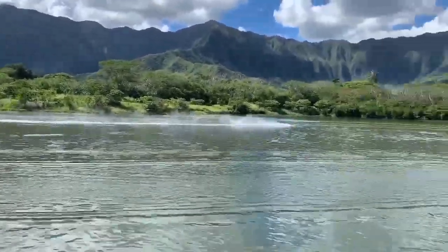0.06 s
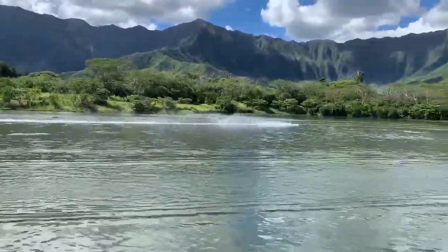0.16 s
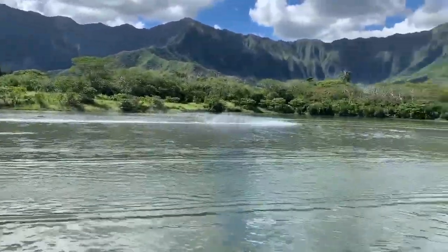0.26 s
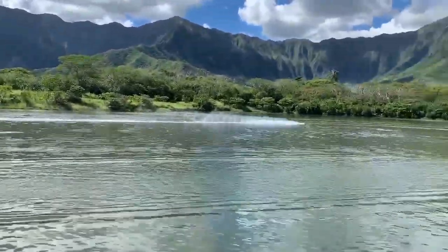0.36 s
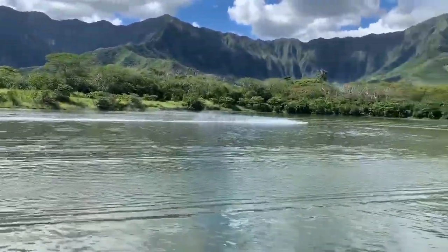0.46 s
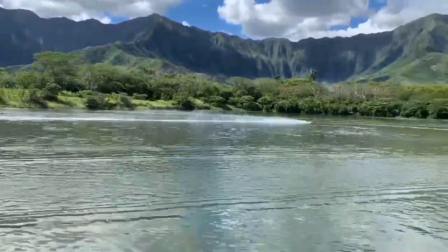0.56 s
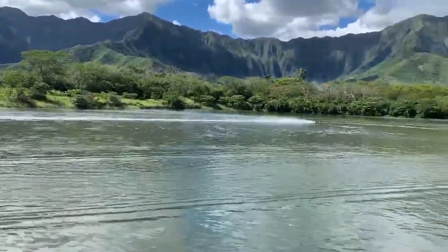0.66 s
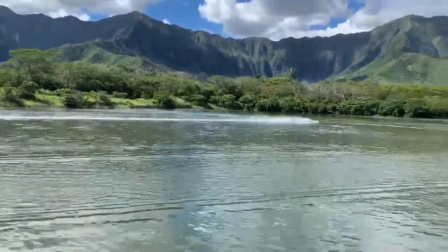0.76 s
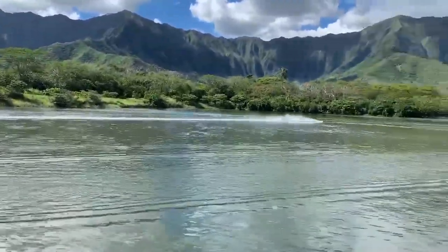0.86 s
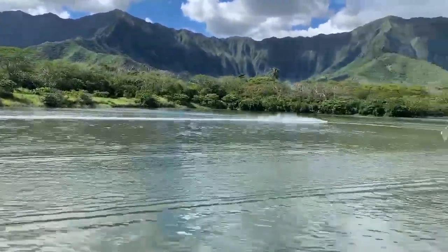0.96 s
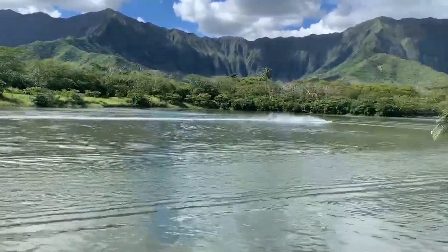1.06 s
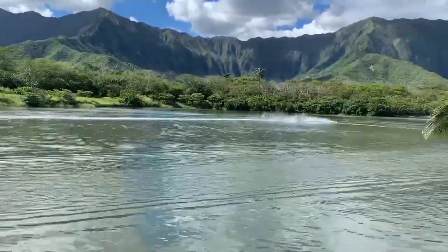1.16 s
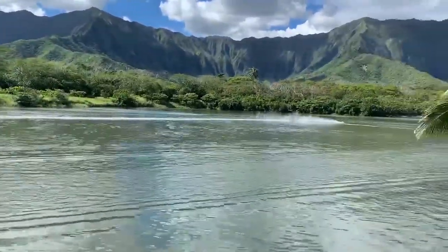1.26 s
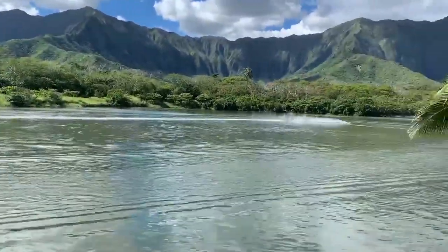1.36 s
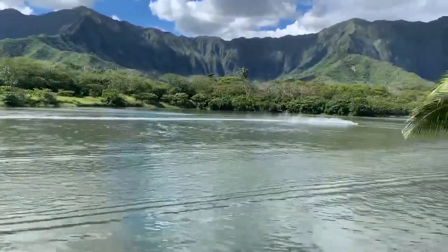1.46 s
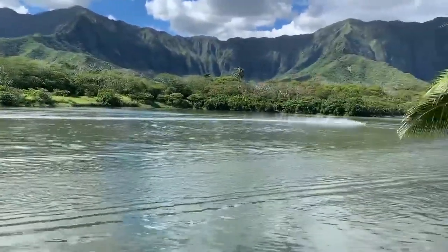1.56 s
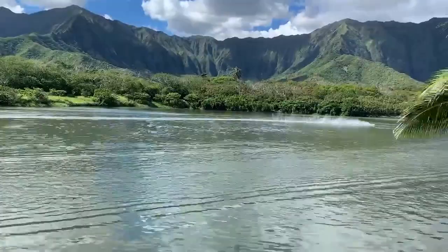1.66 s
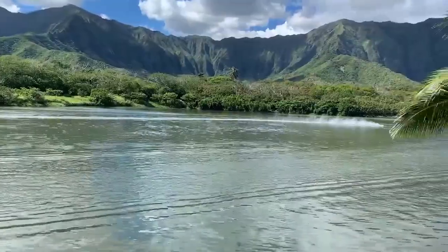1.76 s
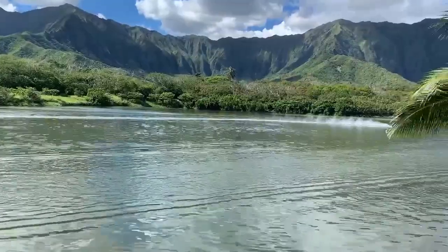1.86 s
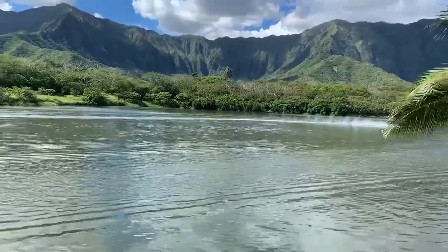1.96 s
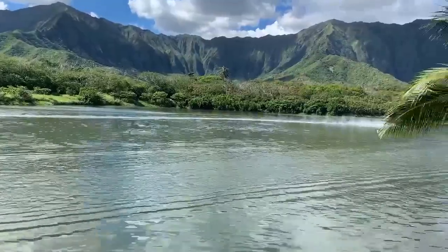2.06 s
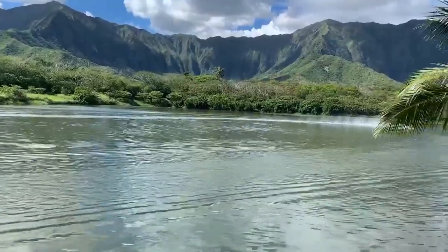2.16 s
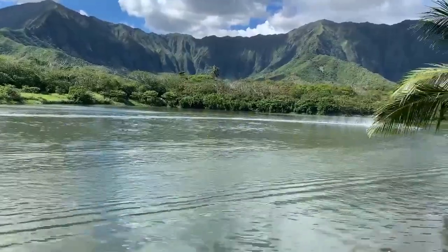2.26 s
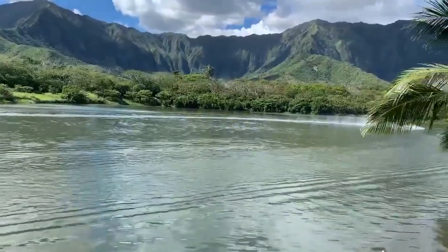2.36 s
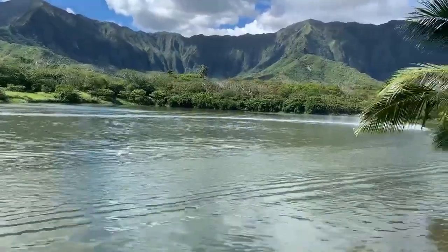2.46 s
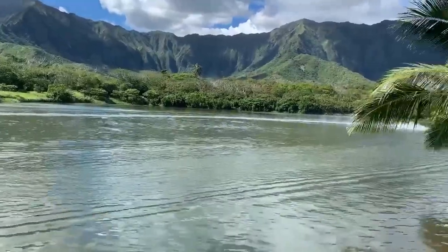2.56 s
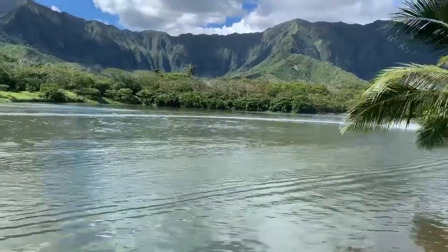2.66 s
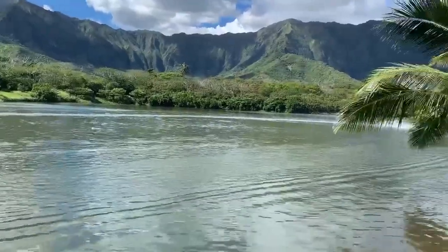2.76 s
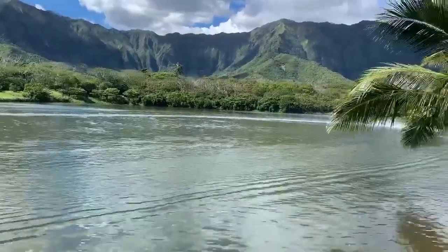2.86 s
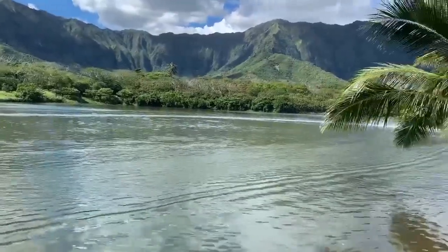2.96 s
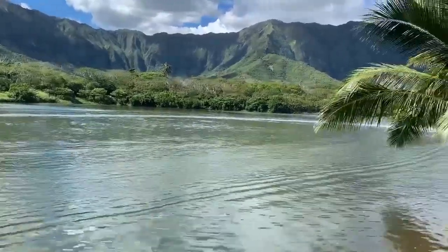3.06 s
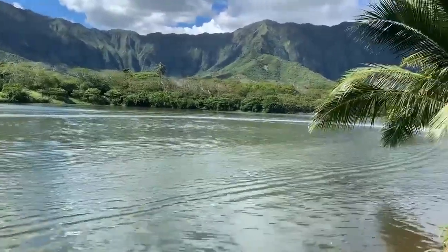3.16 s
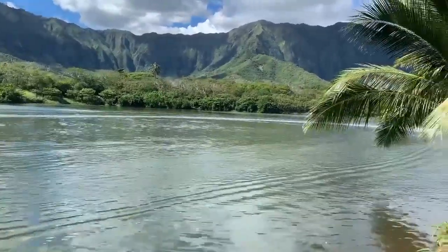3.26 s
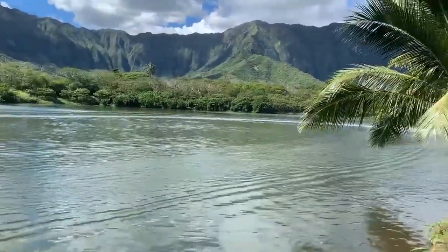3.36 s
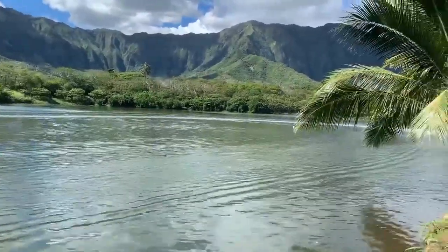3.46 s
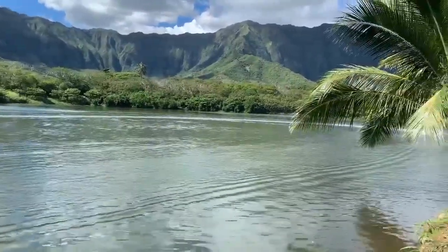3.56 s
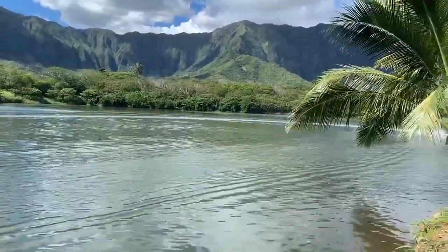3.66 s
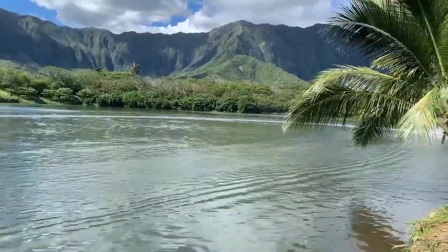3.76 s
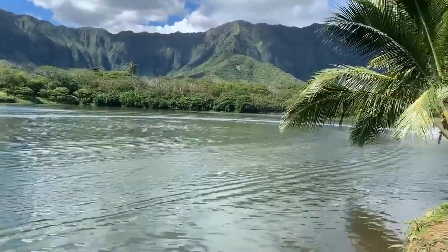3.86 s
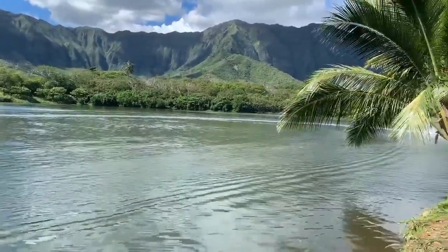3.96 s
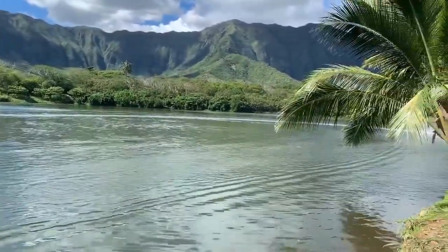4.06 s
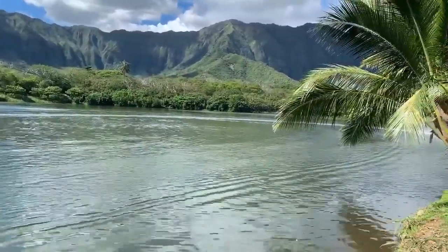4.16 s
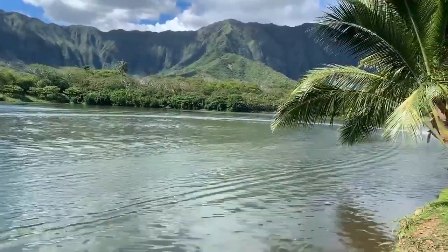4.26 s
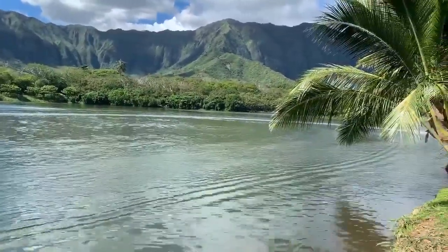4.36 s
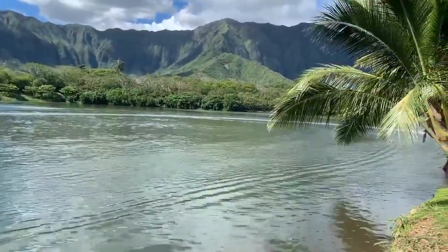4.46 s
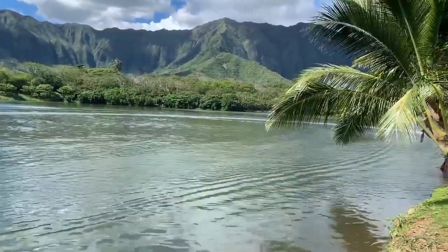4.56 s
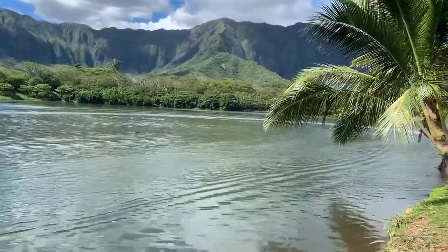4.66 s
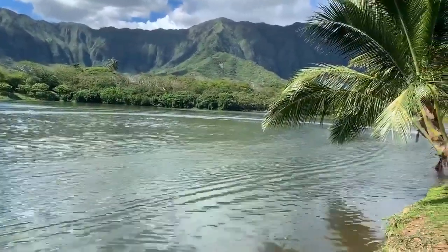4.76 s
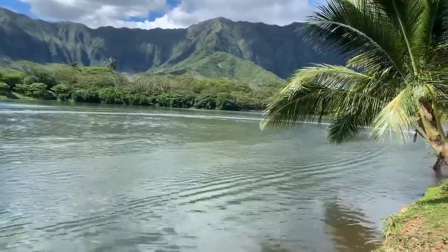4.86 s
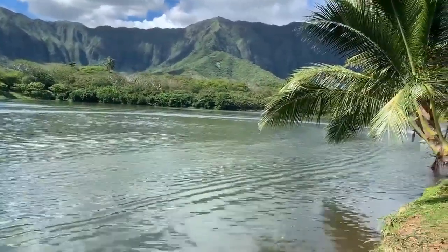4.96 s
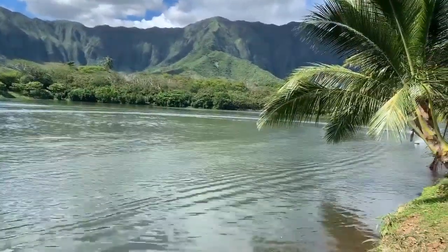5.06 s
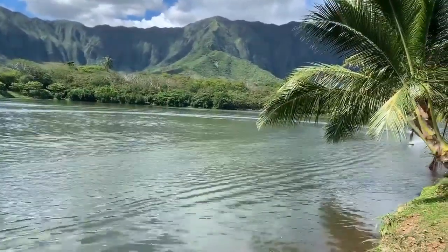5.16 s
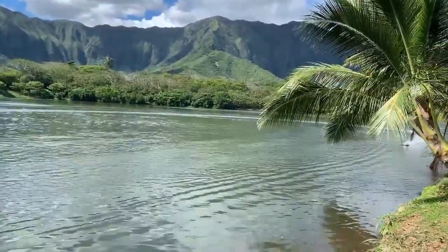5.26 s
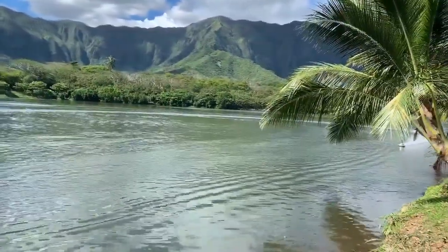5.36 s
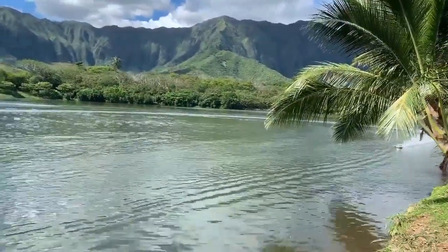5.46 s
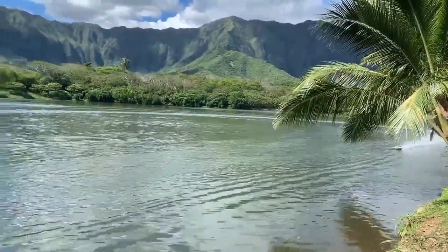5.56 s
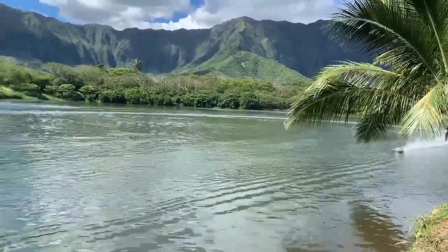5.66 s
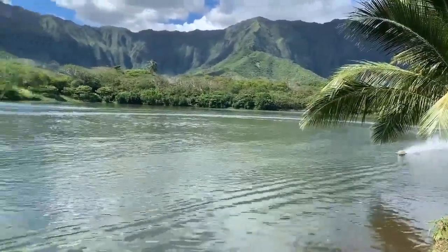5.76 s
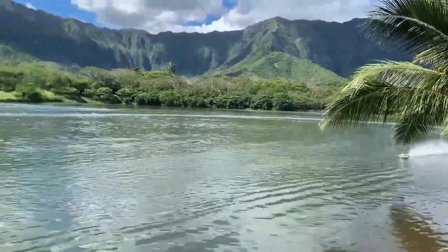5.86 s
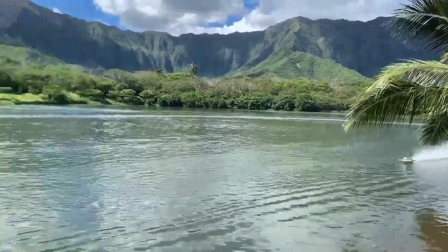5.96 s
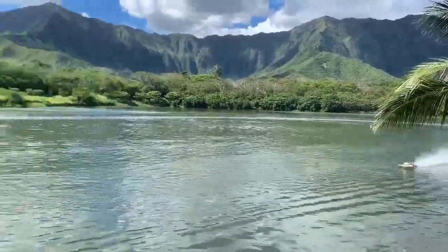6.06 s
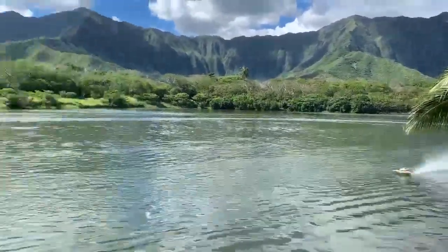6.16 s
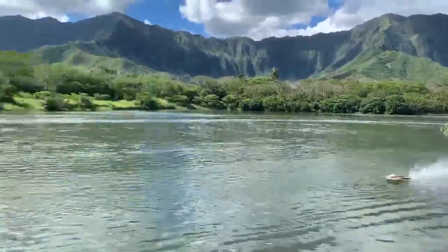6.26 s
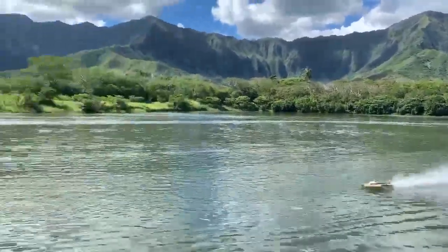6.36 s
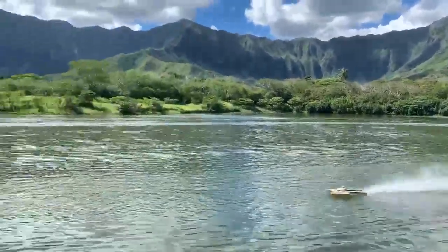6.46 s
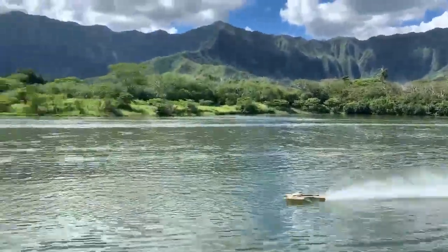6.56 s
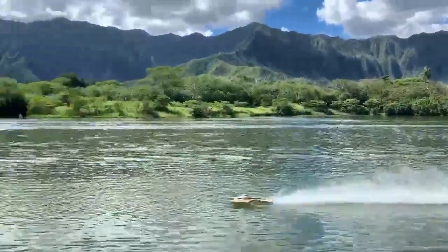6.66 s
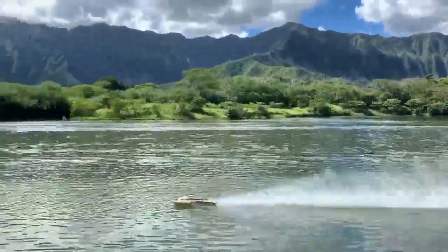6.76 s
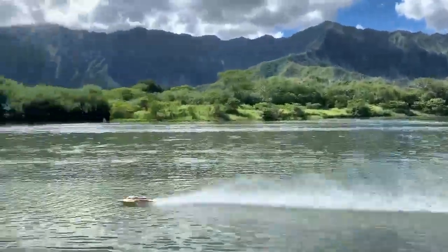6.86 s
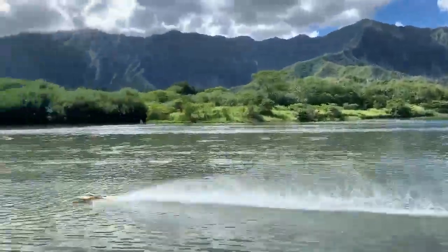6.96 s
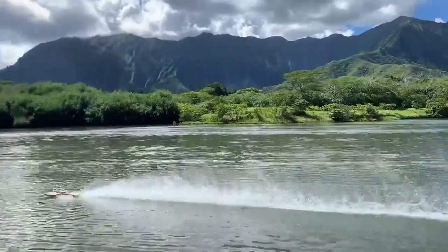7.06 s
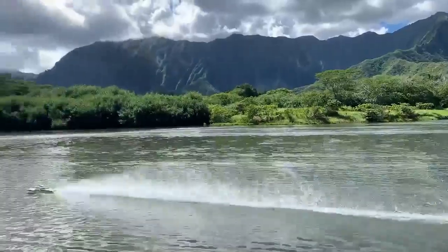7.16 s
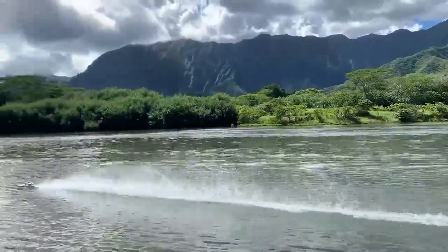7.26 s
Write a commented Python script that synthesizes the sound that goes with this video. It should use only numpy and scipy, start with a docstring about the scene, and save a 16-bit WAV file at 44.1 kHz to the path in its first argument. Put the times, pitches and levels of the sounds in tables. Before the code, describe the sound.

A model racing boat with a tiny two-stroke engine buzzes away over a river, its whine fluttering as the hull hops. In the far turn the throttle shuts twice, the pitch dropping to a mutter with pops and climbing back. The engine sags briefly, then returns louder and rasping, passing close in rushing spray with one hull slap. Open riverbank, stereo microphone on shore, faint echo from the banks, light breeze rumble.

```python
"""A model hydroplane with a small two-stroke engine races round a river course, heard from the bank.
It runs away, hopping so the revs race; in the far turn the throttle shuts twice and the pipe mutters and pops.
Then it sags under load, comes back and passes close by in a swell of spray, with one slap of the hull.
Each firing is a tone, a bark of pipe overtones and a jet of cracks and hiss that rasps and sizzles.
The banks echo the engine, filtered noise rushes behind the hull and a light breeze rumbles throughout."""
import sys
import numpy as np
from scipy import signal
from scipy.fft import rfft, irfft, next_fast_len
from scipy.io import wavfile
from scipy.ndimage import uniform_filter1d, map_coordinates

SR = 44100
rng = np.random.default_rng(int(sys.argv[2]) if len(sys.argv) > 2 else 0)


def transcribe(u):
    """Save the signal u as a 16-bit wav file named by the first command-line argument.

    u: samples, shape (n,) or (channels, n), limited to [-1, 1]; the rate is SR.
    q: integer samples, one column per channel.
    """
    v = np.clip(np.atleast_2d(u).T, -1, 1)
    q = np.round(v * 32767).astype(np.int16)
    wavfile.write(sys.argv[1], SR, q)


N = 321930


def from_db(db):
    """Decibels to gain."""
    return 10 ** (np.asarray(db) / 20)


def rms_one(x):
    """Scale to unit power."""
    return x / np.sqrt(np.mean(x ** 2) + 1e-20)


def evened(x, size=2200):
    """Unit power from moment to moment."""
    power = np.mean(np.atleast_2d(x) ** 2, axis=0)
    smooth_power = uniform_filter1d(uniform_filter1d(power, size), size)
    return x / np.sqrt(smooth_power + 1e-12)


def in_time(rows):
    """Each column of a curve at every sample; the first column is the time in seconds."""
    s, *columns = np.transpose(rows)
    return [np.interp(np.arange(N) / SR, s, column) for column in columns]


def bump(when, lasts):
    """Bell-shaped swell that falls to 1/e at lasts seconds from its top."""
    return np.exp(-((np.arange(N) / SR - when) / lasts) ** 2)


def at_hz(points, hz):
    """Read a spectrum on a log-frequency axis."""
    f, value = np.transpose(points)
    return np.interp(np.log(hz + 1e-3), np.log(f), value)


def coloured(x, spectrum):
    """Filter a sound by a spectrum that rolls off beyond both ends; rms 1."""
    size = next_fast_len(N)
    hz = np.arange(size // 2 + 1) * SR / size
    low_end = np.minimum(hz / spectrum[0][0], 1) ** 2
    high_end = np.minimum(spectrum[-1][0] / (hz + 1), 1) ** 2
    gain = low_end * high_end * from_db(at_hz(spectrum, hz))
    return rms_one(irfft(rfft(x, size) * gain, size)[..., :N])


def drift(rate):
    """Chance wandering with spread 1: noise through two equal low-pass poles at rate Hz."""
    step = 40  # samples between the computed values
    r = np.exp(-2 * np.pi * rate * step / SR)
    noise = rng.standard_normal(N // step + 2002)
    slow = signal.lfilter([1], [1, -2 * r, r * r], noise)[2000:]  # the filter has settled by then
    return np.interp(np.arange(N) / step, np.arange(len(slow)), rms_one(slow))


# How alike diffuse sound is at the two microphones. Each row: frequency in Hz, coherence from 0 to 1.
LIKENESS = [(60, 1), (300, 0.54), (800, 0.37), (1600, 0.042), (3500, 0.22), (10000, 0.12)]


def diffuse(size):
    """White stereo noise, alike in the bass and mostly unrelated above."""
    mid, side = rfft(rng.standard_normal((2, next_fast_len(size, True))))
    alike = np.clip(at_hz(LIKENESS, np.linspace(0, SR / 2, len(mid))), -1, 1)
    return irfft(np.sqrt(1 + alike) * mid + np.sqrt(1 - alike) * side * [[1], [-1]])[:, :size]


def placed(x, lag_ms):
    """The sound reaches one microphone before the other; a positive lag delays the left."""
    shift = lag_ms * SR / 2000  # half the lag to each side, in samples
    return np.array([map_coordinates(x, [np.arange(N) + sign * shift], order=3, mode="nearest")
                     for sign in (-1, 1)])


# Breeze level. Each row: time in seconds, level in dB.
BREEZE_LEVEL = [(0, -46.5), (1.5, -44), (3.3, -43.5), (3.9, -38), (4.7, -44), (5.3, -38), (5.9, -48.5),
                (7.3, -49)]
# Breeze colour, a low rumble. Each row: frequency in Hz, relative density in dB per Hz.
BREEZE_COLOUR = [(15, -22), (30, -9), (55, 4), (130, -2.5), (250, -13), (2000, -19.5), (10000, -84)]


def breeze():
    """Light wind: diffuse low-heavy noise whose level wanders."""
    level_db = in_time(BREEZE_LEVEL)[0] + drift(2.7)
    return from_db(level_db) * coloured(diffuse(N), BREEZE_COLOUR)


# One slap of the hull: time of its top in seconds, level in dB, time to fall to 1/e in seconds.
SLAP = (6.867, -21.5, .016)
# Slap colour. Each row: frequency in Hz, relative density in dB per Hz.
SLAP_COLOUR = [(250, 1), (450, -8), (850, 14), (1400, -16)]


def slap():
    """A short thump of water under the hull."""
    when, level_db, lasts = SLAP
    return from_db(level_db) * bump(when, lasts) * coloured(diffuse(N), SLAP_COLOUR)


FAR_BARK_DB = -30.5  # bark level of the distant boat, the reference for rush and echo
# the rush grows only a little with the bark: level at FAR_BARK_DB, dB per dB of bark above it
RUSH_DB, RUSH_FOLLOWS = -40, 0.029
# the plume of spray sweeps past the bank: top in s, time to fall to 1/e in s, added dB at the top
PASS_S, PASS_LENGTH_S, PASS_RUSH_DB = 6.44, 0.77, 12
CUT_RUSH_DB = -7.5  # the spray sinks too as the boat slows, at the bottom of a throttle cut
# Rush of spray and rough exhaust. Each row: frequency in Hz, relative density in dB per Hz.
RUSH_COLOUR = [(60, -19), (150, -6), (400, 1.5), (580, -2), (850, 5), (1400, 4), (1950, -15.5), (2600, 3),
               (3100, -23), (3600, -37)]


def spray(turns, bark_db, slump):
    """Noise of spray and rough exhaust that throbs with the firings and swells as the plume goes by."""
    passing_db = PASS_RUSH_DB * bump(PASS_S, PASS_LENGTH_S)
    level_db = RUSH_DB + RUSH_FOLLOWS * (bark_db - FAR_BARK_DB) + passing_db + CUT_RUSH_DB * slump
    throb = (1 + .75 * np.cos(2 * np.pi * turns)) * from_db(.9 * drift(15))
    return from_db(level_db) * coloured(diffuse(N) * throb, RUSH_COLOUR)


BANK_T60_S, BANK_DELAY_S = 1, .058  # time for the tail to fall by 60 dB, delay of the single echo
# echo against direct sound in dB: at FAR_BARK_DB, the floor close by, and dB lost per dB of bark
FAR_ECHO_DB, NEAR_ECHO_DB, ECHO_FOLLOWS = -4.5, -11.5, 0.49


def echo_level(bark_db):
    """The fainter the boat, the more of it comes by way of the banks."""
    return np.maximum(NEAR_ECHO_DB, FAR_ECHO_DB - ECHO_FOLLOWS * (bark_db - FAR_BARK_DB))


def with_banks(x, echo_db, scatter_db=-3):
    """The nearest bank returns one echo and its trees scatter a tail, so every change of pitch is heard twice."""
    t = np.arange(int(BANK_T60_S * SR)) / SR
    paths = diffuse(SR * 2)[:, :len(t)] * from_db(-60 * t / BANK_T60_S) * (t > .02)
    paths = paths * from_db(scatter_db) / np.sqrt(np.sum(paths[0] ** 2))
    paths[:, int(BANK_DELAY_S * SR)] += 1
    paths = paths / np.sqrt(np.sum(paths[0] ** 2))
    echo = signal.fftconvolve(x.mean(axis=0)[None], paths, axes=1)[:, :N]
    # direct and echo share the power, so the overall level holds
    return (x + from_db(echo_db) * echo) / np.sqrt(1 + from_db(echo_db) ** 2)


# Engine speed with the propeller in the water, as heard; it sags under the load of the turn.
# Each row: time in seconds, firings per second.
CRUISE = [(0, 240.7), (0.7, 250.3), (1.3, 255.3), (2.1, 257.5), (2.9, 255.1), (3.8, 249.4), (4.3, 237.4),
          (4.58, 199.6), (4.74, 210.8), (4.85, 235.6), (5.15, 227.1), (5.6, 233.2), (6.0, 230.9),
          (6.65, 236.4), (6.95, 229.0), (7.3, 230.0)]


def cruising():
    """Revs at open throttle before the hops and landings are added."""
    return in_time(CRUISE)[0]


# The hull hops off a ripple and the unloaded engine races.
# Each row: time of the top in seconds, rise in firings per second, whole length in seconds.
HOPS = [(0.08, 6, 0.17), (0.378, 6, 0.09), (0.71, 6, 0.05), (0.84, 24, 0.16), (0.975, 13, 0.11),
        (1.15, 21, 0.12), (1.245, 9, 0.05), (1.437, 6, 0.12), (1.568, 7, 0.08), (1.689, 11, 0.11),
        (1.77, 11, 0.06), (1.844, 22, 0.06), (1.932, 19, 0.08), (2.014, 13, 0.05), (2.16, 12, 0.05),
        (2.205, 11, 0.04), (2.265, 15, 0.05), (2.356, 28, 0.07), (2.415, 16, 0.06), (2.493, 19, 0.05),
        (2.577, 17, 0.1), (2.674, 19, 0.06), (2.73, 10, 0.04), (2.802, 29, 0.08), (2.905, 24, 0.08),
        (2.966, 13, 0.04), (3.478, 20, 0.07), (3.555, 9, 0.05), (3.682, 17, 0.13), (3.76, 31, 0.08),
        (4.29, 19, 0.12), (4.92, 17, 0.17), (5.243, 6, 0.14), (5.433, 12, 0.14), (5.67, 13, 0.09),
        (5.752, 12, 0.15), (6.09, 4, 0.12), (6.355, 9, 0.13), (6.474, 8, 0.19), (6.765, 4, 0.06),
        (6.9, 5, 0.06)]
# The hull lands hard and the propeller bites.
# Each row: time of the bottom in seconds, change in firings per second, whole length in seconds.
LANDINGS = [(0.325, -4, 0.07), (1.04, -5, 0.08), (1.615, -8, 0.06), (1.885, -13, 0.04), (2.295, -7, 0.06),
            (2.46, -7, 0.04), (2.845, -7, 0.06), (3.615, -7, 0.06), (5.36, -3, 0.06), (6.0, -2, 0.08),
            (6.84, -4, 0.09)]


def hops():
    """Extra firings per second: a smooth swell each time the propeller lifts, a dip when it bites."""
    t = np.arange(N) / SR
    racing = np.zeros(N)
    for top, rise, length in HOPS + LANDINGS:
        racing += rise * np.cos(np.pi * np.clip((t - top) / length, -.5, .5)) ** 2
    return racing


# The driver lifts off for the far turn. Each row: shut in seconds, reopened in seconds,
# back at speed in seconds, firings per second that the revs sink towards,
# share of the revs won in a last surge as the pipe comes into tune.
THROTTLE_CUTS = [(2.97, 3.17, 3.46, 102, .22), (3.841, 4.02, 4.225, 66, 0)]
# time constant of the falling revs, curve of their return, length of the last surge
COAST_S, PICKUP_POWER, SURGE_S = .07, 1.25, .045
FADE_S, SWELL_POWER = 0.028, 1.48  # the bark fades sooner than the revs, and swells back with them


def throttled(open_speed):
    """Revs die away exponentially and pick up ever faster; slump in power: 0 wide open, 1 at the bottom."""
    t, speed, slump = np.arange(N) / SR, open_speed, 0
    for shut, reopened, back, lowest, surge in THROTTLE_CUTS:
        coasted = np.clip(t, shut, reopened) - shut
        pickup = np.clip((t - reopened) / (back - reopened), 0, 1)
        last_surge = np.clip(1 + (t - back) / SURGE_S, 0, 1)
        regained = (1 - surge) * pickup ** PICKUP_POWER + surge * last_surge
        speed = speed + (lowest - speed) * (1 - np.exp(-coasted / COAST_S)) * (1 - regained)
        slump = slump + (1 - np.exp(-coasted / FADE_S)) * (1 - pickup ** SWELL_POWER)
    return speed, slump


# the hull chatters over the ripples above this speed: firings per s, added waver share per firing per s,
# and the calm waver share
CHATTER_FROM_HZ, CHATTER_PER_HZ, CALM_WOBBLE = 250, .0015, .0022
OPEN_JITTER, CUT_JITTER = 0.0028, 0.022  # speed scatter as a share: wide open, and added by a closed throttle


def crank(speed, cruise, slump):
    """Crank turns, one firing each: the propeller's load wavers and no two firings are timed alike."""
    wobble = CALM_WOBBLE + CHATTER_PER_HZ * np.maximum(cruise - CHATTER_FROM_HZ, 0)
    jitter = OPEN_JITTER + CUT_JITTER * slump
    return np.cumsum(speed * (1 + wobble * drift(14.76) + jitter * drift(90.0))) / SR


def firings(turns):
    """A chance value of spread 1 for every firing, joined by straight lines."""
    count = int(turns[-1]) + 2
    return np.interp(turns, np.arange(count), rng.standard_normal(count))


def resonate(x, hz, width):
    """One resonance with a gain of about 1 on top."""
    r = np.exp(-np.pi * width / SR)
    b = np.array([1, 0, -1]) * (1 - r * r) / 2
    return signal.lfilter(b, [1, -2 * r * np.cos(2 * np.pi * hz / SR), r * r], x + 1e-18)


# Off the pipe the engine pops and rings the silencer. Each row: frequency in Hz, width in Hz,
# level in dB at POP_AT_HZ firings per second with falling revs and the pipe fully out of tune.
POP_RINGS = [(410, 160, -69), (1080, 280, -47), (2590, 1100, -58)]
POP_AT_HZ, POP_PULL_DB, POP_UNEVEN_DB = 151, 10.5, 1.2  # firings per s; lift as revs rise; spread per firing


def sputter(turns, speed, on_pipe):
    """Off the pipe, soft uneven puffs burble in the silencer, harder as the revs pick up."""
    puffs = np.exp(-1.8 * (turns % 1)) * (1 + rng.standard_normal(N))
    fired = puffs * from_db(POP_UNEVEN_DB * firings(turns))
    pops = np.zeros(N)
    for hz, width, level_db in POP_RINGS:
        ring = resonate(resonate(fired, hz, width), hz, width)
        pops += from_db(level_db) * rms_one(ring)
    pulling = uniform_filter1d(1.0 * (np.gradient(speed) > 0), size=3000)
    return (1 - on_pipe) * speed / POP_AT_HZ * from_db(POP_PULL_DB * pulling) * pops


def stretched(x, ring_s, size=1024):
    """Short reflections in pipe and hull draw each crack out without colouring it."""
    ring = rfft(rng.standard_normal((2, size)) * np.exp(-np.arange(size) / SR / ring_s))
    paths = np.roll(irfft(ring / abs(ring)), size // 2, axis=1)  # phase only
    return signal.fftconvolve(x, paths, mode="same", axes=1)


def jet(turns, lag_ms, hiss, ring_s, uneven_db, count=3):
    """The port opens with a sharp crack, and a puff of turbulent gas decays until the next firing."""
    phase = (turns + .5) % 1 - .5
    samples_off = phase / np.gradient(turns)
    crack = placed(np.sinc(samples_off / 1.8), lag_ms)
    # the reflections come and go as the hull rocks
    cracks = evened(sum(drift(4.4) * stretched(crack, ring_s) for _ in range(count)) + 0.5 * crack)
    puff = rms_one(np.exp(-(turns % 1)) * diffuse(N))
    return from_db(uneven_db * firings(turns)) * (cracks + hiss * puff) / np.sqrt(1 + hiss ** 2)


# Brief bursts and longer swells of shrill exhaust treble. Each row: time of the top in seconds,
# level in dB, time to fall to 1/e in seconds, centre in Hz, quarter of the band's span in Hz.
SHRILL = [(0.18, -41.5, 0.15, 5840, 1410), (1.378, -44, 0.042, 4080, 700), (5.657, -55, 0.0067, 4500, 1600),
          (6.327, -33, 0.029, 7300, 1300), (6.453, -34, .025, 6700, 1000), (6.638, -30.5, 0.12, 4800, 1400),
          (6.916, -24, 0.14, 6540, 1090), (7.174, -43, 0.12, 6400, 900)]


def shrill(gas):
    """Bursts and swells of exhaust treble: the gas jet filtered to a band, each under a bell-shaped level."""
    out = 0
    for when, level_db, lasts, hz, width in SHRILL:
        band = [(hz - 2 * width, -30), (hz, 0), (hz + 2 * width, -30)]
        out = out + from_db(level_db) * bump(when, lasts) * coloured(gas, band)
    return out


# From astern the jet cracks cleanly, from elsewhere it is more turbulent.
# Each row: time in seconds, hiss per unit of crack.
TURBULENCE = [(0, .08), (.65, .15), (1, .6), (3.7, .8), (4.4, .5), (6.3, .6), (6.7, .7), (7.05, .35),
              (7.3, .25)]
# Lower part of the gas jet. Each row: frequency in Hz, relative density in dB per Hz.
RASP_COLOUR = [(2800, 15), (3250, 9), (3500, -0.5), (3900, 11.5), (4400, 8), (5000, 2.5), (6100, 4),
               (7200, -2), (8200, -20)]


def rasp(turns, lag_ms, level_db):
    """Lower gas jet at the pipe mouth, with its shrill bursts and swells on top."""
    gas = jet(turns, lag_ms, hiss=in_time(TURBULENCE)[0], ring_s=.004, uneven_db=1.2)
    return from_db(level_db) * coloured(gas, RASP_COLOUR) + shrill(gas)


# Upper part of the gas jet. Each row: frequency in Hz, relative density in dB per Hz.
SIZZLE_COLOUR = [(6800, -94), (7700, 0), (8500, 3.5), (9800, 3), (10500, -4), (11000, -9.5), (11700, -93)]


def sizzle(turns, lag_ms, level_db):
    """Upper gas jet: finer, less even cracks and hiss at the very top."""
    fine_gas = jet(turns, lag_ms, hiss=.5, ring_s=.003, uneven_db=2)
    return from_db(level_db + 1.3 * drift(2.2)) * coloured(fine_gas, SIZZLE_COLOUR)


def firing_tone(turns, level_db):
    """Fundamental of the exhaust: one sine cycle per firing, its level trembling."""
    return -from_db(level_db + 1.16 * drift(50.0)) * np.sqrt(2) * np.cos(2 * np.pi * turns)


def ringing_lag(colours_db):
    """Minimum phase of each overtone: every pulse starts sharply and the pipe rings on after it."""
    mirrored = np.log(from_db(np.concatenate([colours_db, colours_db[::-1]])))
    return signal.hilbert(mirrored, axis=0).imag[:len(colours_db)]


# Colours of the bark: by the side of the boat in view, by its place on the course, and (LABOURING)
# while the revs sag under load. Each list: relative level in dB of overtones 2 to 13.
STERN = [-26, -10.5, -15, 1.5, -2.5, -13, -2.5, -12.5, -1.5, -9.5, -20, -12.5]
TURNING = [-10.5, -0.5, -5, -3, 1.5, -10, -8.5, -16.5, -5.5, -18.5, -17.5, -17.5]
FAR_SIDE = [-10, 0.5, -7.0, -6, -2, -20.5, -8.5, -16, -4.5, -9, -18, -11]
APEX = [-7, -1.5, 3, 2, 3, 3, -19, -2, -7, -4, -20, -10]
LABOURING = [-6.5, 0.5, -16.5, -5.5, -0.5, -4, 1.5, -4.5, -26.5, -10, -4.5, -8]
BOW = [-15.5, -11, -9.5, 0.5, -16.5, -6, -19, -29, -16.5, -6.5, -14, -13.5]
CLOSING = [-19.5, -10, -7.5, -0.5, -12.5, -0.5, -22, -23, -8.5, -18, -8.5, -13.5]
QUARTER = [-11.5, -3.0, -1, -6.5, -7, 1, -14, -17, -8, -19, -1, -2.5]
BEAM = [-11, -11.5, -8, -1, -4, 2.5, -30, -9.5, -2.5, -18, -11.5, -15]
LEAVING = [-12, -4, -11.5, -1, -0.5, -5, -12, -6.0, -7, -8.5, -18, -22]
BARK_COLOURS = [STERN, TURNING, FAR_SIDE, APEX, LABOURING, BOW, CLOSING, QUARTER, BEAM, LEAVING]
# At low revs the pipe is out of tune and only mutters. Each row: frequency in Hz, relative level in dB.
MUTTER = [(150, 0.5), (380, 3), (600, -10), (800, -1), (1150, -10), (2000, -11)]
# Spray and a long path over the ripples turn the high overtones into a rattle.
# Each row: time in seconds, frequency in Hz where the rattle has twice the tone's power.
ROUGH_FROM = [(0, 16000), (.65, 13000), (.9, 6500), (1.6, 6500), (1.9, 3900), (2.9, 3500), (3.5, 5500),
              (3.8, 4300), (4.3, 8000), (5, 12000), (6.2, 13000), (6.6, 8000), (6.9, 7000), (7.15, 13000)]
MUTTER_ROUGH_HZ, RATTLE_HZ = 1800, 70  # that frequency while muttering; rate of the rattle
FRAIL_RANGE_DB = 13  # flutter share is .4 at 0 dB and climbs by 1 per this many dB down, up to 1
# flutter of the frailest overtones: close by, and added by a long path when the echo equals the direct sound
NEAR_FLUTTER_DB, FAR_FLUTTER_DB = 2.2, 4


def pipe_bark(turns, speed, place, on_pipe, lag_ms, far, size=100):
    """Overtones of the firing, gliding between colours; ripples make them flutter and the high ones rattle."""
    out, tuned, ears = np.zeros((2, N)), on_pipe[::size], np.array([[-1], [1]])
    angle = 2 * np.pi * (turns + ears * speed * lag_ms / 2000)
    orders = np.arange(len(STERN)) + 2
    hz = orders[:, None] * speed[::size]
    in_tune_db = np.array([np.interp(place[::size], np.arange(len(BARK_COLOURS)), by_place)
                           for by_place in np.transpose(BARK_COLOURS)])
    colours_db = tuned * in_tune_db + (1 - tuned) * at_hz(MUTTER, hz)
    lags = ringing_lag(colours_db)
    flutter_db = NEAR_FLUTTER_DB + FAR_FLUTTER_DB * far
    rough_hz = on_pipe * in_time(ROUGH_FROM)[0] + (1 - on_pipe) * MUTTER_ROUGH_HZ
    scatter = drift(RATTLE_HZ) + 1j * drift(RATTLE_HZ)
    blocks = np.arange(0, N, size)
    for k, colour_blocks, lag_blocks in zip(orders, colours_db, lags):
        colour_db = np.interp(np.arange(N), blocks, colour_blocks)
        lag = np.interp(np.arange(N), blocks, lag_blocks)
        # strong overtones hold steadier, weak ones are at the mercy of the ripples
        frail = np.clip(.4 - colour_db / FRAIL_RANGE_DB, .4, 1)
        gain = from_db(colour_db + frail * flutter_db * drift(11.8))
        # ripples bend the phase too, a little differently at each microphone
        bend = np.sqrt(k) * (.05 * frail * flutter_db * drift(22) + .11 * ears * drift(4))
        # no two barks are alike in their fine shape; neighbouring overtones scatter together
        scatter = .8 * scatter + .6 * (drift(RATTLE_HZ) + 1j * drift(RATTLE_HZ))
        rough = (k * speed / rough_hz) ** 1.5
        shape = (1 + rough * scatter) / np.sqrt(1 + 2 * rough ** 2)
        out -= gain * abs(shape) * np.cos(k * angle - lag + bend + np.angle(shape))
    # out of tune the engine fires more unevenly and sputters
    sputter_db = (1.0 + 1.3 * (1 - on_pipe)) * firings(turns)
    return evened(out * from_db(sputter_db))


# Exhaust loudness at open throttle. Each row: time in seconds, firing tone in dB, pipe bark in dB,
# rasp in dB, sizzle in dB.
LOUDNESS = [(0.0, -28, -24.5, -33.5, -37), (0.27, -29, -24.5, -33.5, -33.5),
            (0.65, -28.5, -29.5, -32.5, -41), (1.05, -31.5, -32.5, -47, -57.5),
            (1.4, -31.5, -31, -42.5, -45.5), (2.1, -31.5, -32, -43, -53), (2.9, -33.5, -31, -39, -52),
            (3.75, -31.5, -30.5, -35, -44), (4.3, -32, -25, -36, -43.5), (4.6, -34.5, -28.5, -35.5, -47),
            (4.92, -28.5, -21.5, -30.5, -36.5), (5.15, -27.5, -21.5, -29, -34),
            (5.6, -28, -18.5, -22.5, -30.5), (5.95, -28, -19, -28, -36), (6.55, -24, -19.5, -27, -28),
            (6.9, -20.5, -19, -29.5, -32), (7.2, -28.5, -22.5, -27.5, -21.5),
            (7.3, -28.5, -22.5, -27, -31.5)]
# The course. Each row: time in seconds, colour of the bark as a place in BARK_COLOURS,
# lag of the left microphone in milliseconds.
COURSE = [(0, 0, 0.059), (.3, 0, -0.039), (.68, 0.3, -0.037), (.95, 1.0, -0.1), (1.7, 1.0, 0.03),
          (2.5, 2, 0.09), (2.95, 2, .09), (3.45, 3, .11), (3.9, 3, 0.13), (4.22, 5, 0.16), (4.4, 5, .14),
          (4.5, 4, .1), (4.7, 4, 0.085), (4.82, 5, 0.14), (5.25, 5, 0.12), (5.42, 6, 0.089),
          (5.8, 6, 0.067), (5.97, 7, 0.16), (6.25, 7, 0.093), (6.42, 8, 0.058), (6.68, 8, 0),
          (6.95, 9, -0.09), (7.3, 9, -0.11)]
# how far each voice of the exhaust sinks at the bottom of a cut
CUT_TONE_DB, CUT_BARK_DB, CUT_RASP_DB, CUT_SIZZLE_DB = -17, -11.5, -15.5, -25.5
HOP_TONE_DB_PER_HZ, HOP_BARK_DB_PER_HZ = 0.24, 0.1308  # per extra firing per s
LANDING_RASP_DB_PER_HZ = 0.88  # rasp and sizzle flare as the propeller bites
OFF_PIPE_TONE_DB = -2  # the firing tone is weaker while the pipe is out of tune
PAN_DB, PAN_DB_PER_MS = -2, -10  # left against right: at no lag, and per ms of left lag


def scene():
    """Breeze, spray and engine at the two microphones."""
    cruise = cruising()
    tone_db, bark_db, rasp_db, sizzle_db = in_time(LOUDNESS)
    place, lag_ms = in_time(COURSE)
    racing = hops()
    speed, slump = throttled(cruise + racing)
    turns = crank(speed, cruise, slump)
    echo_db = echo_level(bark_db)
    pan_db = PAN_DB + PAN_DB_PER_MS * lag_ms
    # the pipe comes into tune only when the engine is up to speed
    on_pipe = np.clip((speed - 165) / 35, 0, 1)

    tone_db = tone_db + HOP_TONE_DB_PER_HZ * racing + CUT_TONE_DB * slump + OFF_PIPE_TONE_DB * (1 - on_pipe)
    tone = placed(firing_tone(turns, tone_db), lag_ms)
    bark_gain = from_db(bark_db + HOP_BARK_DB_PER_HZ * racing + CUT_BARK_DB * slump)
    bark = bark_gain * pipe_bark(turns, speed, place, on_pipe, lag_ms, far=from_db(echo_db))
    pops = placed(sputter(turns, speed, on_pipe), lag_ms)
    # spray and the bouncing hull hide and bare the pipe mouth
    bared_db = 1.3 * drift(15) - LANDING_RASP_DB_PER_HZ * np.minimum(racing, 0)
    rasping = rasp(turns, lag_ms, rasp_db + CUT_RASP_DB * slump + bared_db)
    sizzling = sizzle(turns, lag_ms, sizzle_db + CUT_SIZZLE_DB * slump + bared_db)

    engine = with_banks(tone, echo_db - 8.0) + with_banks(bark + pops + rasping, echo_db)
    boat = engine + spray(turns, bark_db, slump) + slap()
    return boat * from_db(pan_db * [[.5], [-.5]]) + with_banks(sizzling, echo_db) + breeze()


PEAK_LIMIT, CUTOFF_HZ = .85, 11650  # ceiling of the rounding (full scale 1), top of the band


def record(dry):
    """The tallest peaks are rounded and the top is cut steeply."""
    rounded = dry / (1 + (dry / PEAK_LIMIT) ** 6) ** (1 / 6)
    steep_cut = signal.ellip(12, .05, 90, CUTOFF_HZ, fs=SR, output="sos")
    return signal.sosfilt(steep_cut, rounded)


dry = scene()
out = record(dry)
transcribe(out)
```